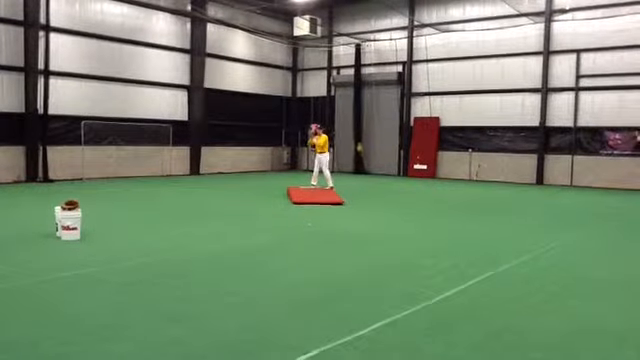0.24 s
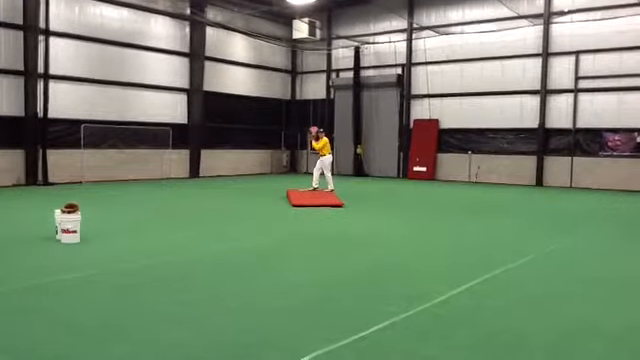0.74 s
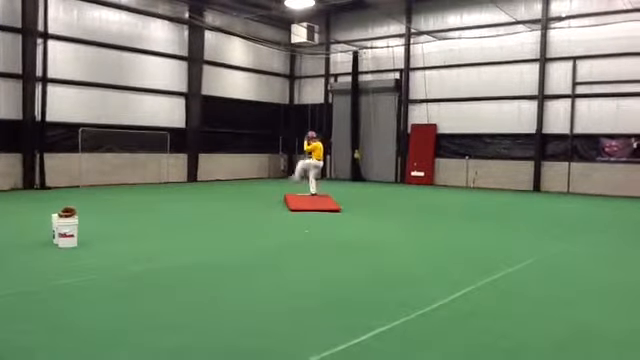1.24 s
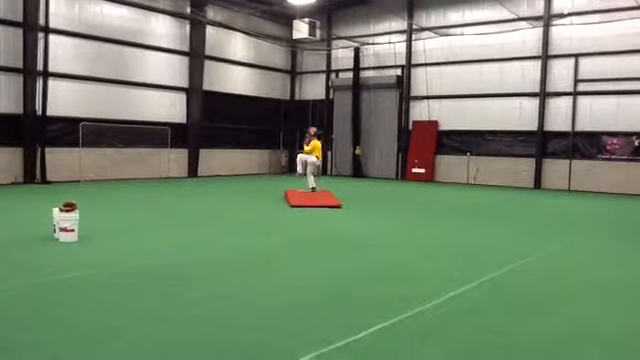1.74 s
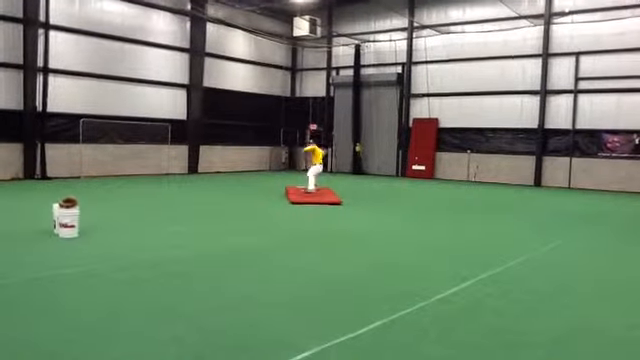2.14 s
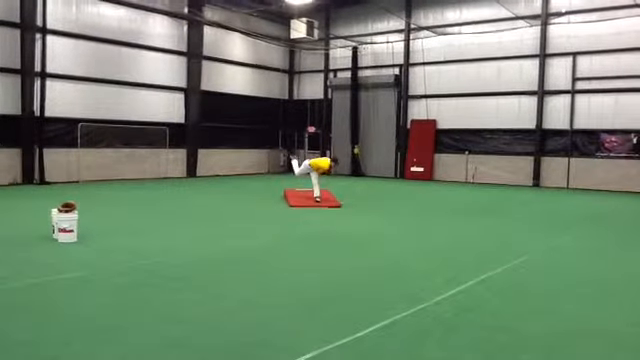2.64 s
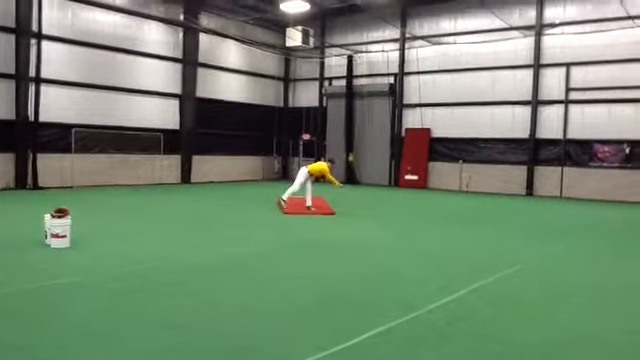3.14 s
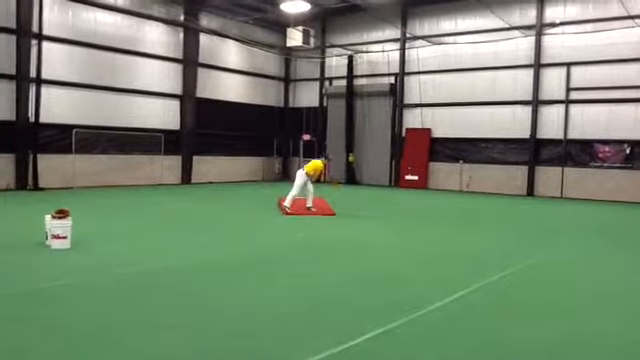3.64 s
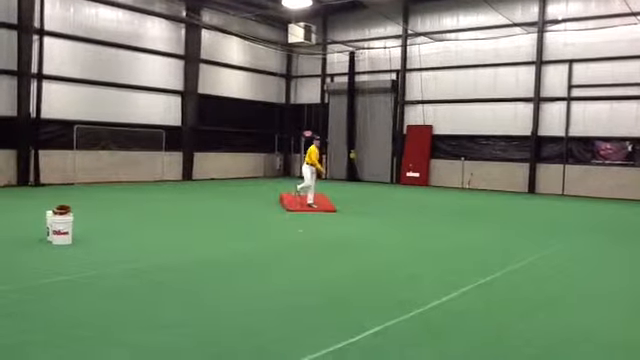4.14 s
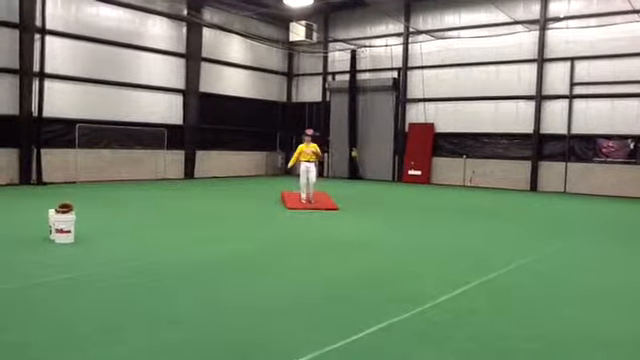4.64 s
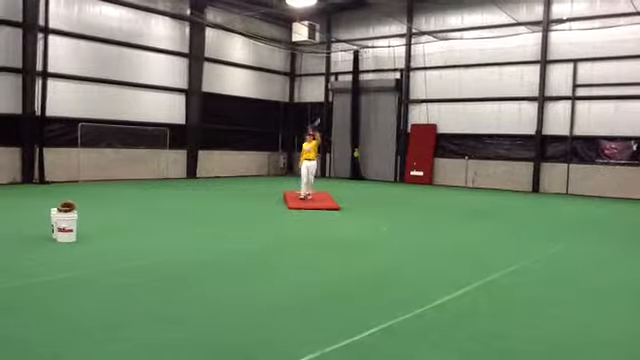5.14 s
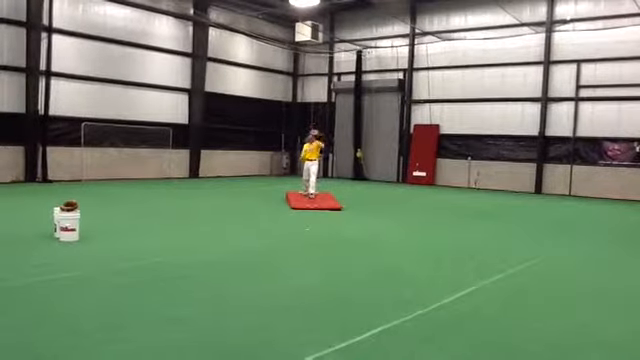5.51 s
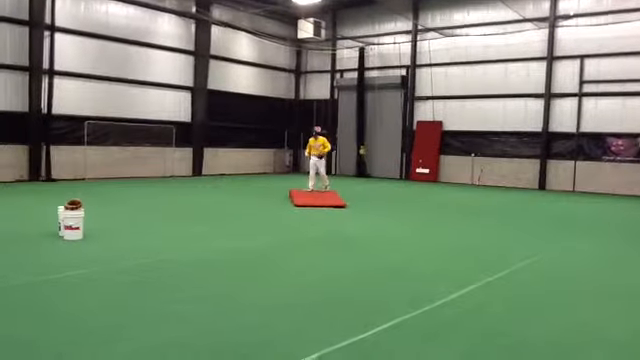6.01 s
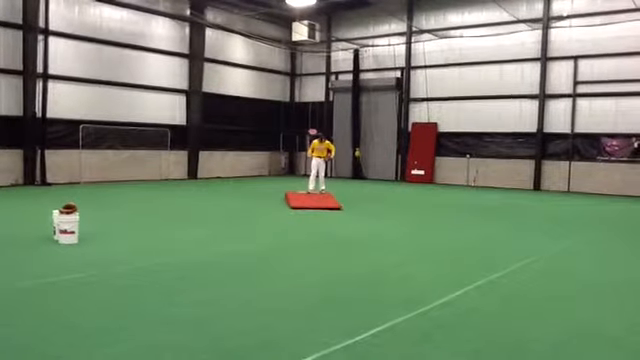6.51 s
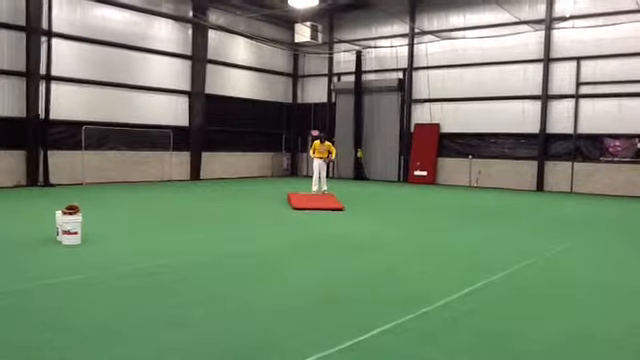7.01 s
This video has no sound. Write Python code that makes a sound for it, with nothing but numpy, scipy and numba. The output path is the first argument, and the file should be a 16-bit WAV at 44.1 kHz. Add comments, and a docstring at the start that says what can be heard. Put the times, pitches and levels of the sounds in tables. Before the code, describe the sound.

A phone close to the catcher hears a large, reverberant steel training hall: soft air noise and a faint low electrical hum throughout. At the very start a barely audible far knock fades, and from 0.3 to 1.6 s tiny foot taps and faint turf scuffs pass. Around 2.35 s the pitcher's stride lands with a low hollow thump on the mound, fluttering between walls, with a dragging scuff. At 2.87 s the ball strikes the near mitt: an extremely loud, sharp leather crack, quick slap echoes and a bright tail over a second long, the background briefly ducked. At 4.1 s faint gear rattles and a step; firmer clicks at 4.4 and 4.73 s amid scuffing. At 5.28 s a softer, lighter glove catch echoes. A short airy brush comes at 5.64 s, a dull thump at 5.98 s, then small steps and scuffs around 6.7 to 7.2 s.

```python
"""In a large steel hall a pitcher strides off a hollow portable mound; the ball cracks into the mitt near
a phone and is tossed back to his glove. Catches, mound and taps are damped modes with bursts of noise;
scuffs on turf are grainy noise, and lamp hum and air noise lie under it all.
Echoes and noise tails make the hall, and the phone's gain control ducks on the loudest crack and creeps back."""
import sys
import numpy as np
from scipy import signal
from scipy.fft import rfft, irfft
from scipy.io import wavfile
from scipy.ndimage import uniform_filter1d, minimum_filter1d
from numba import njit

SR = 44100
rng = np.random.default_rng(int(sys.argv[2]) if len(sys.argv) > 2 else 0)


def put_to_file(sound):
    """Save the sound as 16-bit audio at rate SR, in the file named by the first command-line argument."""
    columns = np.atleast_2d(sound).T  # one column per channel
    safe = np.clip(columns, -1, 1)
    whole_steps = np.round(safe * 32767)
    wavfile.write(sys.argv[1], SR, whole_steps.astype(np.int16))


N = 320607

# ball meeting web, pocket and heel within a few ms: (time [s], level [dB])
MITT_BLOWS = [(2.8679, -24), (2.8691, -4.5), (2.8713, 5), (2.8728, -7.5), (2.8733, -13), (2.8746, -8.5),
              (2.8756, -5)]
GLOVE_BLOWS = [(5.2801, -19), (5.281, -6), (5.2827, -16.5)]
# single wall and roof echoes of each whole catch: (delay [s], level [dB])
MITT_ECHOES = [(.0172, -13), (.031, -19.5), (.041, -17.5), (.0485, -19), (.067, -32), (.119, -28),
               (.136, -24.5)]
GLOVE_ECHOES = [(.0170, -8), (.0235, -17), (.0255, -12.5), (.028, -20), (.054, -26), (.068, -27),
                (.085, -24), (.135, -41)]
# modes of the leather pockets: (frequency [Hz], level [dB], t60 [s])
MITT_MODES = [(69.6, -19.5, 0.0069), (341, -5, 0.056), (490, -10, 0.032), (808, -1.5, 0.031),
              (1480, -1, 0.0045), (3260, 0.5, 0.0051), (4850, 0, 0.0045), (7820, -10, 0.0039)]
GLOVE_MODES = [(191, -15, .04), (287, -10, 0.015), (560, -8, 0.014), (852, -8, 0.038), (1496, -2, 0.019),
               (3830, 5, 0.003), (4840, 1.5, 0.0026), (7580, 5, 0.0014), (10500, -39, 0.002)]
# colour of the leather slap: (frequency [Hz], relative level [dB])
SLAP_COLOUR = [(500, -15), (2000, 1), (5000, -2.0), (9000, -11.5), (11500, -22.0), (15000, -38)]
# colour each catch sends into the hall: (frequency [Hz], relative level [dB per Hz])
MITT_HALL = [(59, -70), (100, -36), (137, -10), (227, -3), (310, -6), (375, -6), (472, -12), (814, 3),
             (1090, -6), (2090, -5.5), (2750, -12.5), (4450, -9), (8880, -26.5), (11000, -37),
             (15000, -65.5)]
GLOVE_HALL = [(59, -47), (100, -11), (204, -1), (252, -9), (291, -3), (367, -7), (733, 2.5), (1110, -4.5),
              (1700, -3), (2470, -7.5), (4350, -6), (6090, -18), (7670, -18.5), (10500, -34.5),
              (15000, -48)]
MITT_HALL_DB, GLOVE_HALL_DB = -20.5, -32
# decay of the hall: (frequency [Hz], t60 [s])
HALL_DECAY = [(100, 2.2), (250, 1.2), (600, 0.7), (1500, 1.374), (4000, 1.624), (7000, 0.96), (12000, 0.83)]

# front foot landing, toe, heel, weight and a small rebound: (time [s], level [dB])
STRIDE_BLOWS = [(2.324, -44.5), (2.354, -23.5), (2.379, -28), (2.397, -29)]
# modes of the hollow mound shell: (frequency [Hz], level [dB], t60 [s])
MOUND_MODES = [(154, 5, 0.094), (200, 0, 0.078), (259, -3.5, 0.082), (328, -9, 0.07), (417, -13, 0.084),
               (537, -18, 0.13)]
# colour the stride sends into the hall: (frequency [Hz], relative level [dB])
STRIDE_HALL = [(80, -40.0), (130, -2.5), (250, -5.0), (450, -8.0), (900, -22.5), (2000, -31.0), (8000, -42.5)]
# boom bouncing between two walls: round trip, first return, loss a round
FLUTTER_S, FLUTTER_FIRST_DB = .048, -11
HEEL_LOSS_DB, WEIGHT_LOSS_DB = -0.52, -2.1

# steps, taps and gear clicks: (time [s], body level [dB], body frequency [Hz], tick frequency [Hz],
# tick over body [dB], grit over body [dB], hall share [dB])
TAPS = [(0.352, -38, 513, 1510, 12.5, -8.5, -24.5), (0.446, -39.5, 437, 770, -3.5, -28, -21.5),
        (.652, -48, 348, 806, -5, -18, -16), (0.78, -45.5, 550, 1080, 2.5, -12, -17),
        (0.908, -44, 230, 600, -16, -27, -24), (0.915, -42, 273, 680, -4.5, -14, -24),
        (1.03, -46, 250, 600, -12, -17, -34), (1.234, -47, 450, 1400, 16.5, 8.5, -24.5),
        (1.572, -42, 232, 600, -10, -25, -30), (1.583, -41, 265, 780, -0.5, -19, -25),
        (2.306, -46, 546, 1240, 3, -15, -5), (4.072, -35.5, 830, 1400, -16, -21, -19),
        (4.123, -43.5, 306, 1030, -9, -4.5, -14), (4.394, -21, 504, 920, -3.5, -19, -28.5),
        (4.397, -30, 4500, 2800, -15, -22, -30), (4.408, -35, 520, 910, 4.5, -24, -21.5),
        (4.419, -34, 515, 910, -5, -20, -26), (4.7292, -22, 4800, 2540, -8, -14, -37.5),
        (4.729, -19, 1530, 680, -19, -25, -47), (4.78, -44, 300, 900, -16, -20, -19),
        (4.838, -41, 430, 1030, -1.5, -8, -21), (4.974, -47, 520, 1110, -2, -6, -19.5),
        (5.11, -50, 250, 596, -5, -20, -21), (5.977, -26, 250, 760, -9, -21, -46),
        (6.364, -40.5, 274, 704, -11, -23, -26), (6.714, -46.5, 226, 760, 1, -5, -17),
        (6.957, -40.5, 224, 630, -1.5, -23, -21), (7.0, -34.5, 204, 880, -13, -8, -19.5)]
BODY_CYCLES, TICK_CYCLES = 8.5, 9.4  # cycles to die by 60 dB
# colour of the grit, and of the hall behind the taps: (frequency [Hz], relative level [dB])
GRIT_COLOUR = [(300, 2.5), (1500, -1), (5000, -12.5), (12000, -31)]
TAP_HALL = [(60, 0.014), (16000, 0)]
# a small hard piece of gear, perhaps a buckle, rattling: (time [s], level [dB])
CLINKS = [(4.072, -53), (4.091, -49.5), (4.103, -52), (4.125, -55), (4.168, -52)]
# its modes: (frequency [Hz], level [dB], t60 [s])
BUCKLE_MODES = [(886, 1, 0.033), (2420, -3.5, 0.057), (2870, -9, .025)]

# shoes and cloth dragging over turf and mound: (loudest time [s], swell over 20 dB [s],
# fade over 20 dB [s], hiss level [dB], dull drag level [dB], hiss centre [Hz])
SCUFFS = [(.27, 0.66, .6, -73, -68.5, 1204), (1.12, .5, 1.3, -70, -72.5, 3410),
          (2.31, 0.018, .55, -54, -46.5, 2450), (2.8, 0.43, 0.2, -55, -52.5, 4690),
          (4.075, .025, .6, -67, -58.5, 1950), (4.4, 0.51, 0.55, -57, -58, 3590),
          (4.64, 0.2, .15, -62.5, -62.5, 3870), (5.15, 0.59, 0.59, -66, -64.5, 2965),
          (5.64, .055, .055, -56, -85, 8000), (6.22, 0.54, 0.93, -69, -67, 3490),
          (6.72, 0.12, 0.13, -56.5, -59, 3020), (7.02, 0.052, 0.13, -60, -60, 3500),
          (7.21, .04, .8, -67.5, -70, 4870)]
# colour of the scuff's hiss and of its dull drag: (frequency [Hz], relative level [dB])
RUB_COLOUR = [(200, 19), (2200, -11), (2700, -5), (4800, 0), (6000, -9.5), (8500, -5), (11000, -21)]
DRAG_COLOUR = [(150, -23.0), (500, 6.5), (900, 1.5), (2000, -2.5), (2600, -34.0)]

# colour of the distant knock: (frequency [Hz], relative level [dB])
CLANK_HALL = [(500, -34), (850, 7.0), (1200, -12), (1700, -2), (2050, 1), (2400, -26)]
# colour of the air noise: (frequency [Hz], relative level [dB per Hz])
AIR_COLOUR = [(30, -29), (60, -3), (95, -9), (180, 2.5), (260, -2), (400, -7), (1130, -10), (1500, -14),
              (5000, -18), (14400, -20.5), (16000, -24)]
AIR_DB, HUM_DB = -62.5, -64  # rms
HUM_HZ, HUM_WIDTH_HZ = 120, 5.2  # a greater width makes the hum waver faster

LIMIT_DB, RECOVER_S = -2, 0.94  # gain control: threshold, time constant of recovery
CEILING = 0.92  # soft overload of the input stage, full scale = 1
TOP_HZ = 15400


def undb(db):
    """Decibels to gain."""
    return 10 ** (np.asarray(db) / 20)


def level(x, db):
    """Scale to an rms level."""
    return x * undb(db) / np.sqrt(np.mean(x ** 2))


def colour(x, points):
    """Shape the spectrum by (Hz, dB) points."""
    hz, db = np.transpose(points)
    log_hz = np.log(np.arange(len(x) // 2 + 1) * SR / len(x) + 1)
    gain = undb(np.interp(log_hz, np.log(hz), db))
    return irfft(rfft(x) * gain, len(x))


def add(track, s, sound):
    """Mix a sound in at a time in seconds."""
    i = int(s * SR)
    track[i:i + len(sound)] += sound[:N - i]


def ring(modes, seconds, contact_s):
    """Response of damped modes to one soft blow; neighbours swing in opposite sense."""
    t = np.arange(int(seconds * SR)) / SR
    body = np.zeros(len(t))
    for k, (hz, db, t60) in enumerate(modes):
        decay = 1000. ** (-t / max(t60, .001))
        body += (-1) ** k * undb(db) * np.sin(2 * np.pi * hz * t) * decay
    return body * (1 - np.exp(-(t / contact_s) ** 2))


def struck(blows, modes, contact_s, blur):
    """Blows on one body, each softer-edged the later it comes after the first, as travelled echoes are."""
    out = np.zeros(N)
    for s, db in blows:
        softened_s = contact_s + blur * (s - blows[0][0])
        add(out, s, undb(db) * ring(modes, 0.18, softened_s))
    return out


def hall(points, db, gap_s, build_s, seconds=3.):
    """Diffuse tail: after a gap the echoes thicken, each band dying at its own rate."""
    t = np.arange(int(seconds * SR)) / SR
    noise = colour(rng.standard_normal(len(t)), points)
    f, _, cells = signal.stft(noise, SR, nperseg=256)
    hz, t60 = np.transpose(HALL_DECAY)
    band_t60 = np.interp(np.log(f + 1), np.log(hz), t60)[:, None]
    frame_s = np.arange(cells.shape[1]) * 128 / SR
    fade = 1000. ** (-frame_s / band_t60)
    tail = signal.istft(cells * fade, SR, nperseg=256)[1][:len(t)]
    # the first echoes come in clumps that even out with time
    steps = np.repeat(rng.standard_normal(len(t) // 200 + 1), 200)[:len(t)]
    clumps = uniform_filter1d(steps, size=200)
    tail = tail * undb(3.0 * clumps * np.exp(-t / .15))
    start_rms = np.sqrt(np.mean(tail[:SR // 10] ** 2))
    build = 1 - np.exp(-np.clip(t - gap_s, 0, None) / build_s)
    return undb(db) * tail / start_rms * build


def catch(blows, modes, contact_s, slap_db, slap_s, echoes):
    """Every blow rings the same pocket and adds its own short slap of leather noise."""
    out, body = np.zeros(N), ring(modes, .08, contact_s)
    t = np.arange(len(body)) / SR
    slap_shape = (1 - np.exp(-t / contact_s)) * np.exp(-t / slap_s)
    for s, db in blows:
        slap = level(colour(rng.standard_normal(len(t)), SLAP_COLOUR), slap_db)
        add(out, s, undb(db) * (body + slap * slap_shape))
    # walls give the sound back a little duller
    back = signal.lfilter([.6], [1, -.4], out)
    return out + sum(undb(db) * np.roll(back, int(s * SR)) for s, db in echoes)


def catches():
    """The crack in the mitt and the softer catch in the glove, each exciting the hall's diffuse tail."""
    out = catch(MITT_BLOWS, MITT_MODES, contact_s=.0001, slap_db=-7.5, slap_s=0.0013, echoes=MITT_ECHOES)
    out += catch(GLOVE_BLOWS, GLOVE_MODES, contact_s=0.00025, slap_db=-5.5, slap_s=0.00098,
                 echoes=GLOVE_ECHOES)
    add(out, MITT_BLOWS[0][0], hall(MITT_HALL, MITT_HALL_DB, gap_s=.005, build_s=0.0064))
    add(out, GLOVE_BLOWS[1][0], hall(GLOVE_HALL, GLOVE_HALL_DB, gap_s=0.0045, build_s=0.0043))
    return out


def stride():
    """The mound booms, the boom flutters between the walls and the hall carries its bass on."""
    _, heel, weight, _ = STRIDE_BLOWS
    flutter = []
    for (s, db), loss_db in ((heel, HEEL_LOSS_DB), (weight, WEIGHT_LOSS_DB)):
        for k in range(1, 11):
            flutter.append((s + k * FLUTTER_S, db + FLUTTER_FIRST_DB + k * loss_db))
    out = struck(list(STRIDE_BLOWS) + flutter, MOUND_MODES, contact_s=0.003, blur=0.02)
    add(out, STRIDE_BLOWS[0][0], hall(STRIDE_HALL, -35.5, gap_s=0.0095, build_s=0.11))
    return out


def taps():
    """Each tap is a short body thump, a tick and a crackle of grit, with a little of the hall."""
    dry, sent = np.zeros(N), np.zeros(N)
    t = np.arange(SR // 50) / SR
    for s, db, body_hz, tick_hz, tick_db, grit_db, hall_db in TAPS:
        tick_s = TICK_CYCLES / tick_hz
        modes = [(body_hz, db, BODY_CYCLES / body_hz),
                 (tick_hz, db + tick_db, tick_s),
                 (1.6 * tick_hz, db + tick_db - 8.5, 0.59 * tick_s)]
        sound = ring(modes, 0.088, contact_s=0.043 / tick_hz)
        grit = level(colour(rng.standard_normal(len(t)), GRIT_COLOUR), db + grit_db)
        sound[:len(t)] += grit * np.exp(-t / 0.0038)
        add(dry, s, sound)
        add(sent, s, undb(hall_db) * sound)
    room = hall(TAP_HALL, -20.5, gap_s=0.0016, build_s=0.0025, seconds=1.2)
    room = room * np.exp(-np.arange(len(room)) / SR / 0.32)
    return dry + signal.fftconvolve(sent, room)[:N]


def clinks():
    """A small hard piece of gear rattles, each knock ringing the same three modes."""
    return struck(CLINKS, BUCKLE_MODES, contact_s=.0003, blur=0)


@njit
def sweep(x, hz, q):
    """Broad band-pass whose centre moves: a state-variable filter."""
    y, band, low = np.empty(len(x)), 0., 0.
    for i in range(len(x)):
        g = np.tan(np.pi * hz[i] / SR)
        v = (band + g * (x[i] - low)) / (1 + g * (g + 1 / q))
        band = 2 * v - band
        low += 2 * g * v
        y[i] = v / q
    return y


def scuffs():
    """Turf fibres slip in uneven grains; scuffs swell and fade, the loudest pulling the hiss to its colour."""
    s, swell, fade, hiss_db, drag_db, hz = np.transpose(SCUFFS)[:, :, None]
    t = np.arange(N) / SR
    shape_db = -20 * np.maximum((s - t) / swell, (t - s) / fade)
    hiss_power = undb(shape_db + hiss_db) ** 2
    drag_power = undb(shape_db + drag_db) ** 2
    centre_hz = (hiss_power * hz).sum(axis=0) / hiss_power.sum(axis=0)
    grains = undb(2.0 * np.repeat(rng.standard_normal(N // 200 + 1), 200)[:N])
    rub = rng.standard_normal(N) * uniform_filter1d(grains, size=150)
    rub = colour(sweep(rub, np.clip(centre_hz, 100, 15000), 0.41), RUB_COLOUR)
    drag = colour(rng.standard_normal(N) * uniform_filter1d(grains, size=400), DRAG_COLOUR)
    hiss = level(rub, 0) * np.sqrt(hiss_power.sum(axis=0))
    return hiss + level(drag, 0) * np.sqrt(drag_power.sum(axis=0))


def far_clank():
    """Something knocked at the far end reaches here only as a soft tail."""
    out = np.zeros(N)
    add(out, .02, hall(CLANK_HALL, -62, gap_s=.01, build_s=0.046))
    return out


def air():
    """Ventilation and microphone hiss as coloured noise."""
    return level(colour(rng.standard_normal(N), AIR_COLOUR), AIR_DB)


def lamp_hum():
    """Ballast hum: one sine whose strength and phase waver slowly at random."""
    sway = uniform_filter1d(rng.standard_normal((2, N)), int(SR / HUM_WIDTH_HZ / 2), axis=1)
    sway = uniform_filter1d(sway, SR // 30, axis=1)
    strength, phase = sway / sway.std()
    tone = np.sin(2 * np.pi * HUM_HZ * np.arange(N) / SR + .5 * phase)
    return level((1 + 0.38 * strength) * tone, HUM_DB)


def scene():
    """Everything that reaches the phone."""
    events = catches() + stride() + taps() + clinks() + scuffs()
    return (events + far_clank() + air() + lamp_hum())[None]


@njit
def creep(need, release):
    """Follows a rising cut at once and lets it creep back."""
    cut = need.copy()
    for i in range(1, len(cut)):
        cut[i] = max(cut[i], cut[i - 1] * release)
    return cut


def duck(x):
    """Gain control that looks 1 ms ahead, cuts what exceeds the limit and recovers slowly."""
    ahead = SR // 1000
    over_db = np.clip(20 * np.log10(np.abs(x) + 1e-9) - LIMIT_DB, 0, None)
    need_db = -minimum_filter1d(-over_db, size=2 * ahead)
    cut_db = creep(need_db, float(np.exp(-1 / (RECOVER_S * SR))))
    return x * undb(-uniform_filter1d(cut_db, size=ahead))


def record(dry):
    """The phone trims the bass, ducks on overload, rounds peaks and cuts the top."""
    bass_cut = signal.butter(4, 90, "high", fs=SR, output="sos")
    top_cut = signal.ellip(10, .2, 60, TOP_HZ, fs=SR, output="sos")
    ducked = duck(signal.sosfilt(bass_cut, dry[0]))
    rounded = CEILING * np.tanh(ducked / CEILING)
    return signal.sosfilt(top_cut, rounded)[None]


dry = scene()
out = record(dry)
put_to_file(out)
```